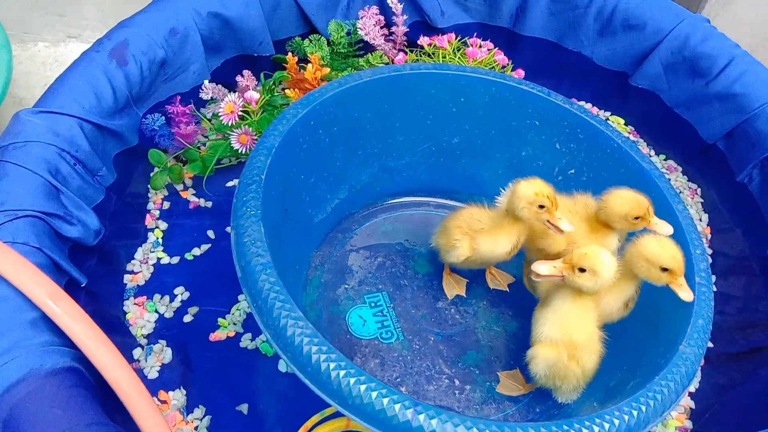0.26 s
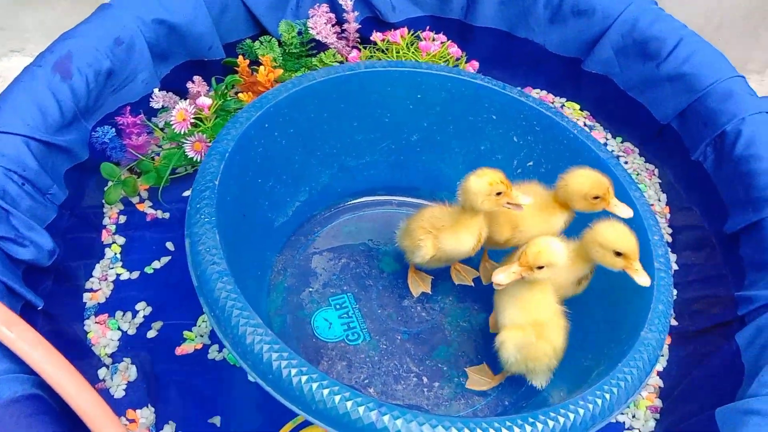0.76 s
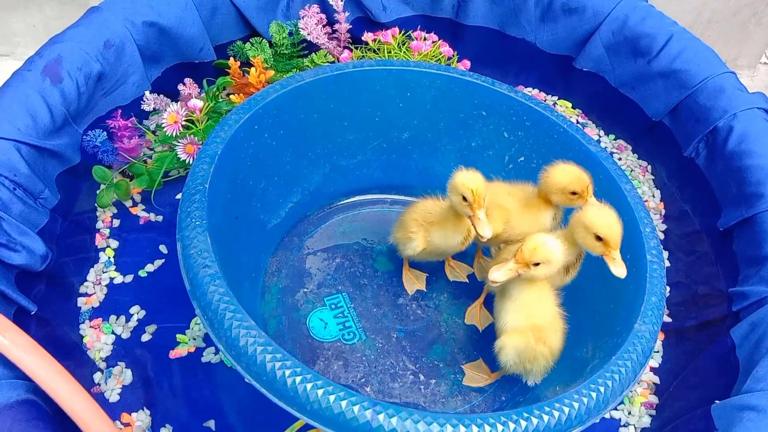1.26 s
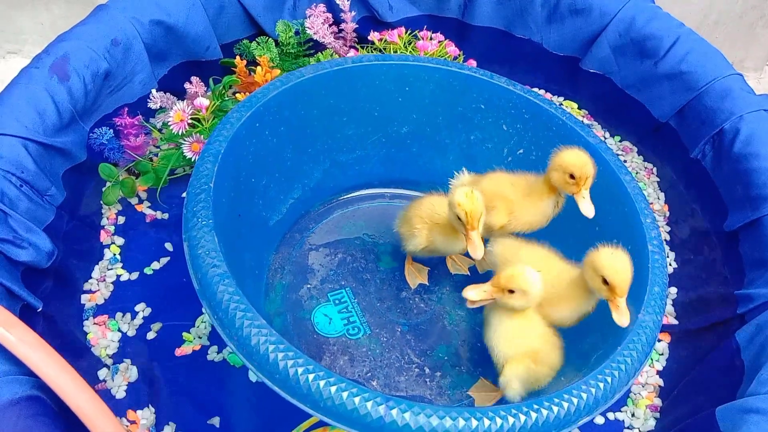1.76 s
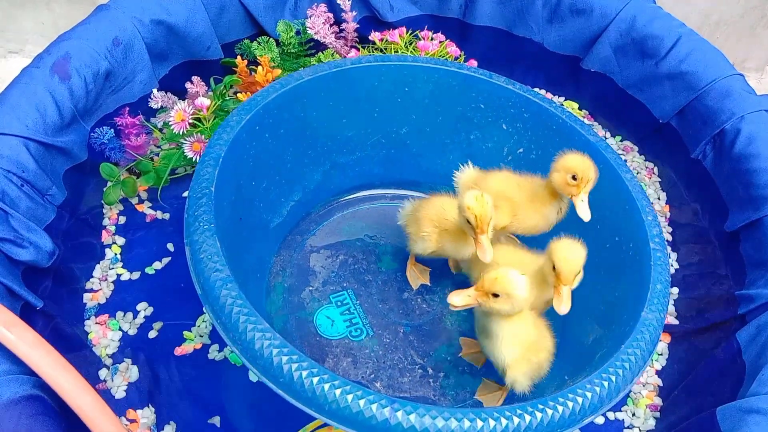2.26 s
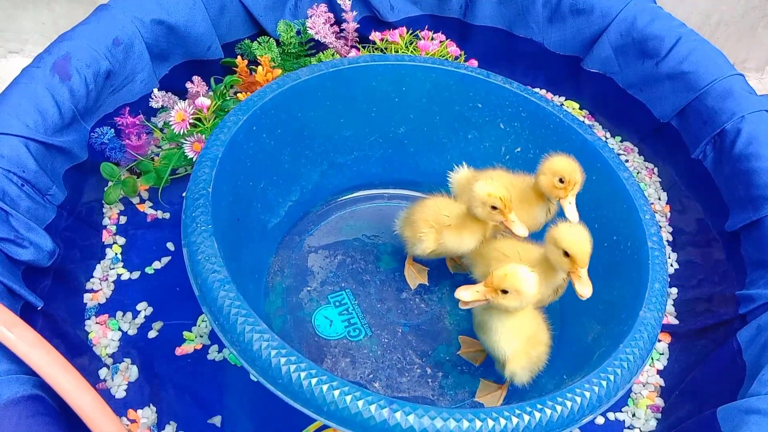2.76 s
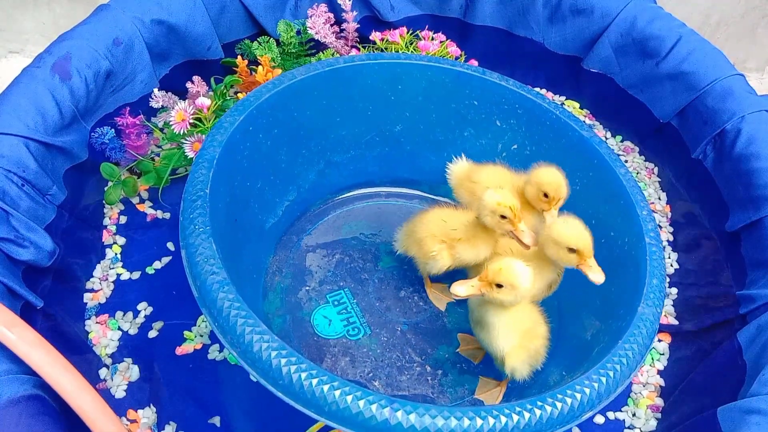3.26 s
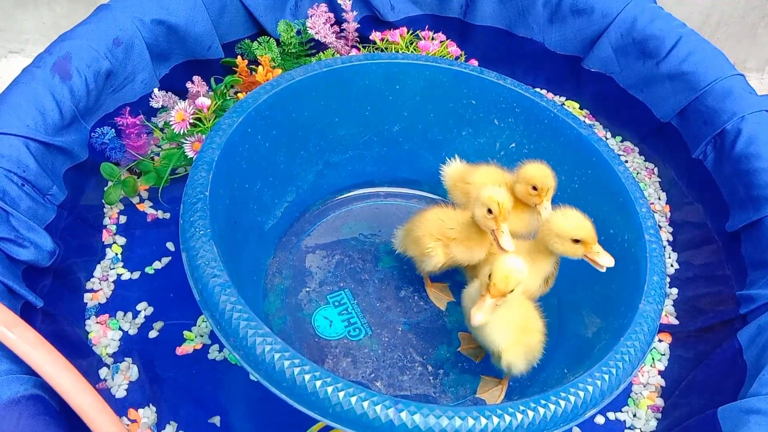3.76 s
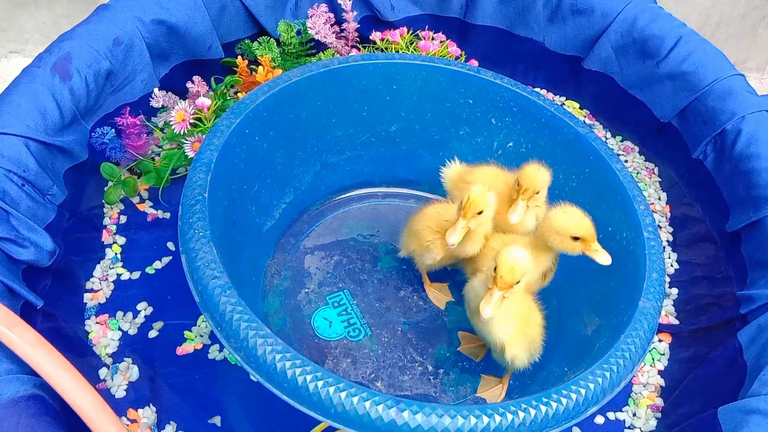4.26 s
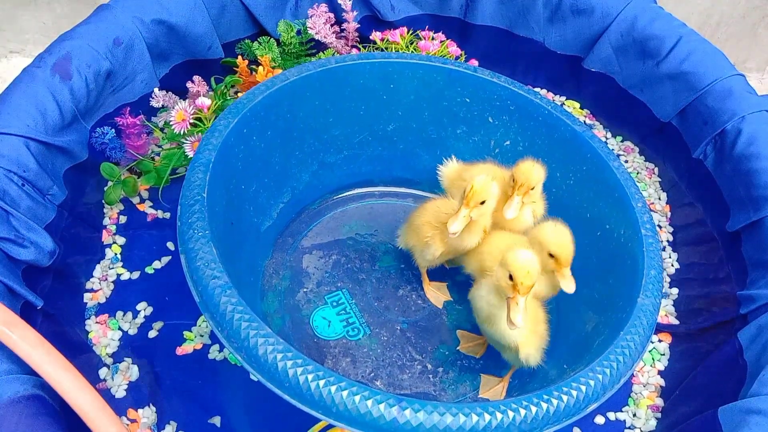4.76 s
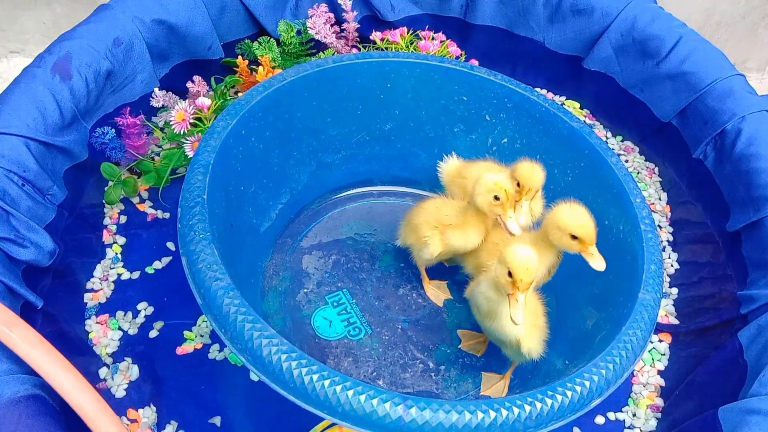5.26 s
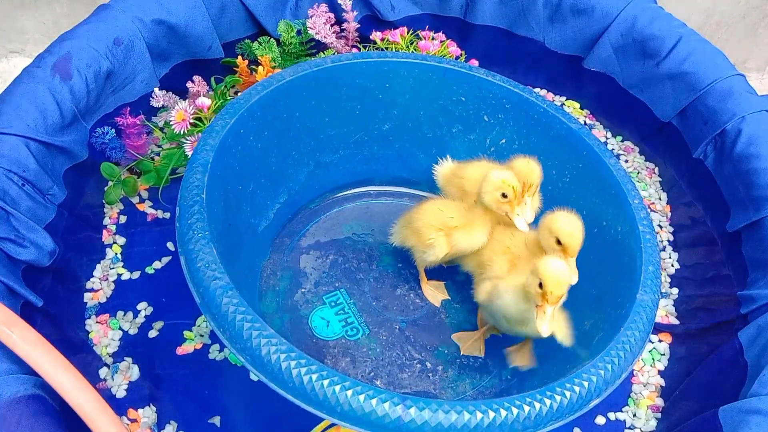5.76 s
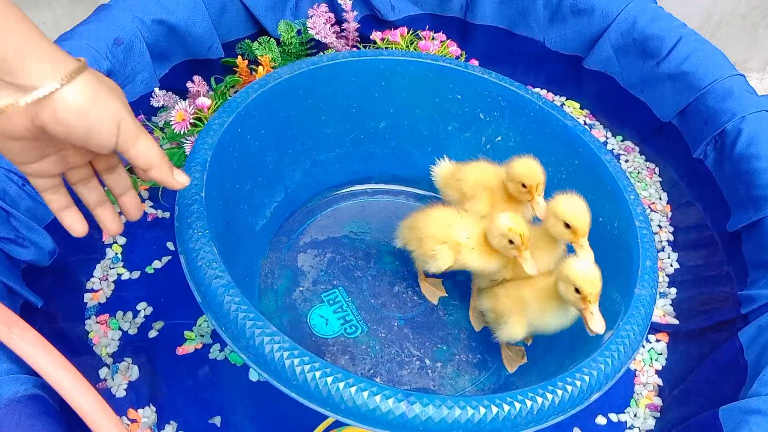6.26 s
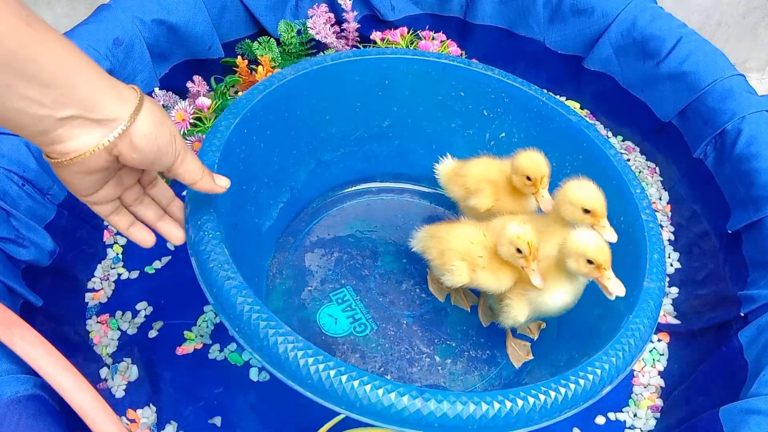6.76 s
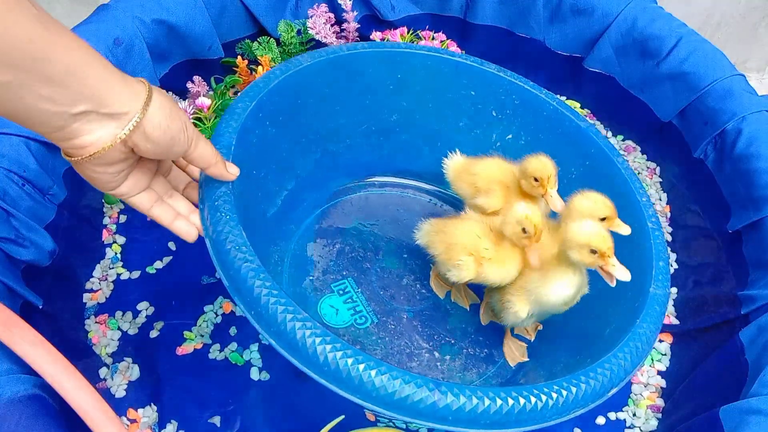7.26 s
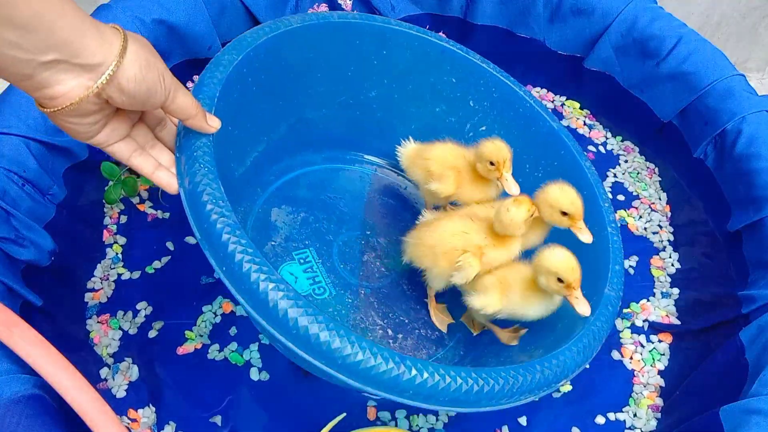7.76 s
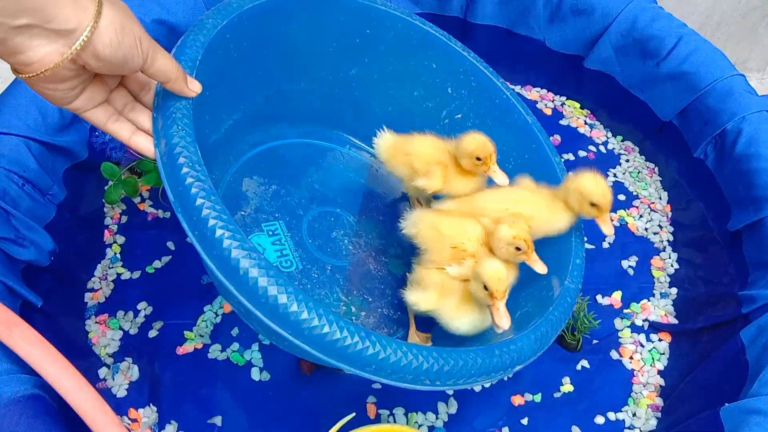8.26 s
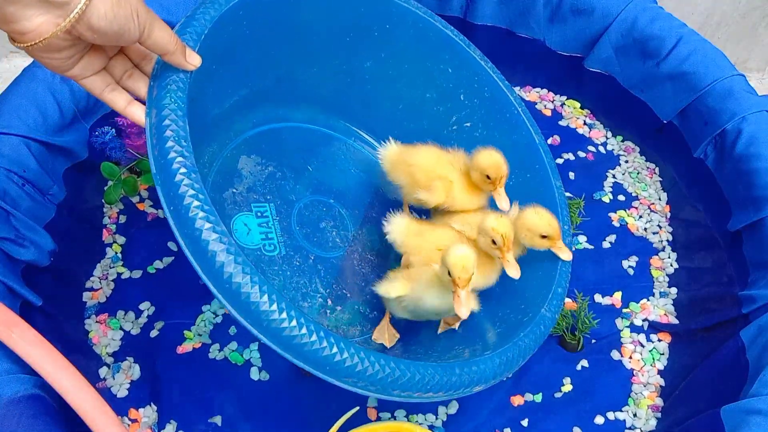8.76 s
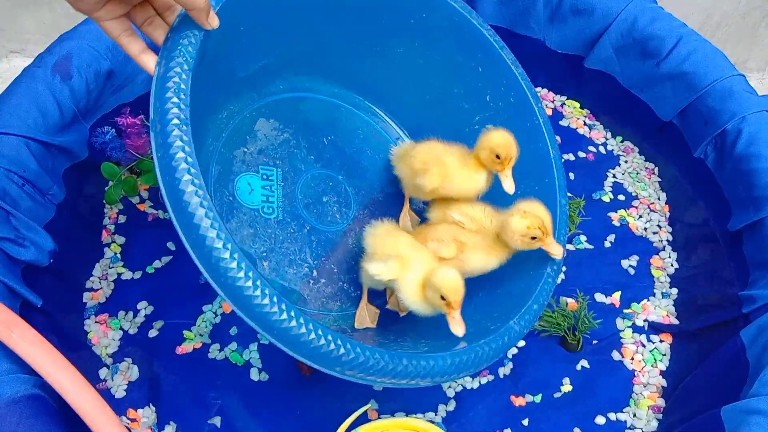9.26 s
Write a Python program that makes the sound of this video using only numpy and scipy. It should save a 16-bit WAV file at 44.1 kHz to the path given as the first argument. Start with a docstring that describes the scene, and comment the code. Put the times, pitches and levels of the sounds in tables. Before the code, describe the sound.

Ducklings peep shrilly over one another in a plastic tub, then call one at a time as their feet tap softly.

```python
"""Ducklings peep over one another in a plastic tub, close up, then call one at a time.
Each peep is a whistle with overtones that chirps in, glides and slides off; the tub and yard echo it.
Webbed feet tap and slip on the plastic, and the tub groans once as it is tipped. Behind them lie
far-off traffic, faint hiss and a late puff of breeze. A phone's suppressor ducks the quiet gaps."""
import sys
import numpy as np
from scipy import signal
from scipy.fft import rfft, irfft, next_fast_len
from scipy.io import wavfile
from scipy.ndimage import uniform_filter1d, map_coordinates

SR = 44100
rng = np.random.default_rng(int(sys.argv[2]) if len(sys.argv) > 2 else 0)


def master_out(mix):
    """Clip the mix to full scale and print it as 16-bit PCM to the path in sys.argv[1]."""
    frames = np.transpose(np.atleast_2d(mix))
    ceiling = np.clip(frames, -1, 1)
    pcm = np.round(ceiling * 32767).astype(np.int16)
    wavfile.write(sys.argv[1], SR, pcm)


N = 419391

# Resonances of the plastic tub: pitch_hz, level_db, t60_s
TUB_MODES = [(450, -7, .025), (610, -3, .02), (790, 0, .025), (1130, 0, .025), (1240, -1, .025),
             (1420, 0, .03), (1650, -2, .02), (2000, -7, .018), (2600, -10, .015)]


def ducklings():
    """The brood: each peep carries a breathy rasp with narrow bands near 4.5 and 5.5 kHz."""
    # One row a peep: start_s, length_s, kind, start_hz, dip_hz, top_hz, end_hz, top_share (of the length),
    # level_db, swell_db, cancel_hz (pitch that the tub's echo cancels), rasp_db
    peeps = [(.01, 0.13, "lead", 3757, 3502, 3692, 3440, 0.8, -18, -1, 3493, -38),
             (0.134, .13, "answer", 3520, 3460, 3755, 3603, 0.5, -19.5, -4, 3950, -30),
             (0.353, .13, "lead", 3705, 3424, 3705, 3717, .8, -19, 2, 3433, -36),
             (0.452, .13, "answer", 3340, 3363, 3773, 3490, 0.5, -20, -2, 3950, -27),
             (.673, .13, "lead", 3782, 3484, 3660, 3563, 1, -21, 3, 3445, -34),
             (.713, 0.11, "thin", 3120, 2880, 2975, 2790, .75, -46.5, -0.5, 2840, -40),
             (0.773, 0.14, "answer", 3379, 3380, 3733, 3467, 0.5, -20, -3, 3950, -27),
             (1.007, .13, "lead", 3686, 3578, 3760, 3750, .85, -19.5, -1.5, 3900, -37.5),
             (1.037, .057, "thin", 3200, 2942, 2870, 2750, .6, -50, 0, 3290, -41.5),
             (1.094, .14, "answer", 3310, 3410, 3759, 3520, 0.5, -23, -4, 3906, -24),
             (1.284, 0.047, "answer", 3360, 3420, 3560, 3446, 0.9, -42.5, 2.5, 3800, -34),
             (1.34, 0.14, "lead", 3727, 3590, 3767, 3830, .75, -18.5, 0, 3870, -39.5),
             (1.417, .14, "answer", 3294, 3360, 3775, 3452, .62, -21.5, 1, 3950, -25.5),
             (1.671, 0.14, "lead", 3807, 3645, 3772, 3770, .75, -18, -3, 3920, -29),
             (1.752, .12, "answer", 3420, 3446, 3723, 3347, .6, -21.5, -3, 3660, -28.5),
             (2.0, 0.13, "lead", 3790, 3648, 3756, 3780, .78, -19, 2, 3840, -35.5),
             (2.073, .13, "answer", 3380, 3358, 3722, 3480, .55, -20.5, -5, 3767, -31),
             (2.296, 0.084, "low", 3100, 2404, 2550, 2450, 0.7, -46.5, 1, 2980, -31),
             (2.337, 0.14, "lead", 3747, 3598, 3757, 3680, .85, -19.5, -3.5, 3817, -36),
             (2.391, 0.12, "late", 3460, 3356, 3705, 3504, 0.5, -21.5, 0, 3950, -31),
             (2.57, 0.086, "low", 3220, 2904, 3022, 2930, .8, -34, 0.5, 2820, -27.5),
             (2.616, 0.038, "answer", 3510, 3680, 3890, 3840, 0.8, -35.5, -0.5, 4100, -30),
             (2.669, 0.13, "lead", 3740, 3590, 3747, 3650, 0.6, -18.5, -3, 3815, -32.5),
             (2.742, 0.12, "late", 3296, 3332, 3754, 3576, 0.5, -21.5, 5.5, 3663, -28),
             (2.843, 0.12, "low", 3280, 3025, 3210, 2932, 0.6, -32.5, 1.5, 3400, -29),
             (2.995, .13, "lead", 3682, 3725, 3843, 3710, 0.8, -21, 7, 3782, -28.5),
             (3.049, .13, "late", 3330, 3383, 3744, 3490, .7, -20.5, 3, 3674, -34.5),
             (3.121, 0.11, "low", 3380, 3100, 3320, 3114, 0.9, -29.5, 2.5, 3500, -23.5),
             (3.321, .13, "lead", 3770, 3603, 3815, 3800, .85, -21.5, 0.5, 3704, -29.5),
             (3.327, 0.065, "thin", 3270, 3105, 3118, 3170, .8, -34, 9.5, 3600, -36.5),
             (3.401, 0.11, "low", 3410, 3224, 3427, 3290, 0.9, -27, -1.5, 3600, -26),
             (3.44, .1, "answer", 3327, 3295, 3708, 3563, 0.5, -21, -3, 3960, -25.5),
             (3.651, .13, "lead", 3720, 3580, 3836, 3625, 0.9, -22.5, -3, 3670, -31.5),
             (3.686, .12, "low", 3360, 3063, 3355, 3403, .85, -26, 10.5, 3600, -32),
             (3.76, .12, "answer", 3314, 3310, 3731, 3450, .55, -20.5, -0.5, 3697, -24),
             (3.992, 0.098, "low", 3450, 3083, 3290, 3114, .72, -29, 1.5, 3500, -31),
             (4.013, .12, "lead", 3730, 3566, 3800, 3400, .7, -24, -2, 3830, -27.5),
             (4.1, .098, "answer", 3227, 3250, 3697, 3450, 0.4, -20, -2, 3670, -23),
             (4.339, .14, "lead", 3728, 3744, 3830, 3490, .72, -21.5, -4, 4000, -27.5),
             (4.401, 0.13, "late", 3200, 3334, 3734, 3464, .62, -25, 2, 3816, -20),
             (4.667, .13, "lead", 3677, 3778, 3865, 3644, 0.7, -19, -1, 3897, -30),
             (4.75, .11, "late", 3230, 3307, 3675, 3534, .75, -22.5, 8.5, 3622, -22),
             (4.989, .14, "lead", 3746, 3607, 3692, 3570, 0.9, -23, 2, 3900, -37),
             (5.118, 0.12, "late", 3220, 3100, 3607, 3568, 0.9, -27.5, 15, 3800, -17),
             (5.357, 0.13, "lead", 3710, 3500, 3766, 3617, .8, -22, 2, 3784, -32.5),
             (5.421, 0.059, "thin", 3210, 3060, 2830, 2500, 0.6, -49, 0, 3400, -17),
             (5.806, .12, "flick", 3070, 2904, 3395, 3510, .9, -35, 23.5, 3789, -11),
             (6.263, 0.089, "flick", 3192, 3077, 3510, 3470, 0.9, -36, 27.5, 3800, -12.5),
             (6.711, 0.098, "soft", 3090, 3185, 3483, 3532, 0.7, -28.5, 5, 3350, -15.5),
             (7.0, 0.12, "late", 3590, 3282, 3795, 3636, .82, -25.5, 7, 4000, -23),
             (7.292, .12, "solo", 3430, 3516, 3790, 3700, .82, -23.5, 4, 4040, -29.5),
             (7.597, .12, "solo", 3310, 3430, 3728, 3665, .7, -23, 3.5, 4000, -27),
             (7.937, .11, "solo", 3250, 3210, 3650, 3610, .8, -23.5, 4.5, 3900, -25.5),
             (8.225, .12, "solo", 3460, 3444, 3794, 3526, .68, -24, 4, 4000, -18.5),
             (8.851, 0.088, "glide", 2776, 2764, 3075, 3920, .3, -33, 29.5, 4200, -13),
             (9.385, .11, "glide", 2896, 2950, 3388, 3900, 0.3, -34, 17.5, 4200, -4)]
    # Colour of the breathy rasp: frequency_hz, relative_db
    breath_spectrum = [(2000, -60), (3600, -28), (4450, 0), (4950, -11), (5500, 0), (6200, -13), (7200, -8),
                       (8200, -32), (16000, -38)]
    # Colour of the burst as the voice breaks off: frequency_hz, relative_db
    burst_spectrum = [(1500, -25.5), (3000, -6), (5000, 6), (8000, -28.5), (15000, -17.5)]
    out, breath, burst = np.zeros(N), patchy(noise(breath_spectrum), depth_db=9), noise(burst_spectrum)
    for row in peeps:
        sound, lead_s = peep(row, breath, burst)
        add(out, row[0] - lead_s, sound)
    return out


def peep(row, breath, burst, chirp_s=.03, settle_s=0.007, slide_s=0.015):
    """One whistle: a hoarse rising chirp, a drop onto the note, a glide and a fast breaking slide."""
    # Character by kind of call: climb (1 prompt, 2 S-shaped), bend (1 straight, more is later),
    # attack_db, release_db (how far down it starts and ends), octave_db, chirp_db
    voices = {"lead": (1.5, 1.5, 5, 7.5, -16.5, -11), "answer": (1.15, 3, 12, 2, -12, -17.5),
              "late": (1.46, 2.5, 9.5, 1.5, -11.5, -22), "low": (1.5, 1.5, 2.5, 1.5, -8, -26),
              "solo": (1.2, 2, 9.5, 1.5, -10.5, -12.5), "soft": (2.3, 0.5, 13, 1, -2.5, -40),
              "flick": (2, 1, 20, 3.5, -4.5, -37), "glide": (1.1, 0.92, 9.5, 5, -9.5, -49),
              "thin": (2.5, 2.3, 5, 0.5, -24.5, -34.5)}
    # Where the pitch dips, by kind of call: dip_share (of the length)
    dips = {"lead": .3, "answer": .06, "late": .17, "low": .38, "thin": .45, "solo": .04, "soft": .04,
            "flick": .28, "glide": .03}
    # Closing slide, by kind of call: pitch_ratio
    slides = {"lead": .6, "answer": .54, "late": .56, "low": .7, "thin": .8, "solo": .54, "soft": .52,
              "flick": 1.24, "glide": 1.12}
    _, length_s, kind, *contour_hz, top_share, level_db, swell_db, cancel_hz, rasp_db = row
    climb, bend, attack_db, release_db, octave_db, chirp_db = voices[kind]
    t = np.arange(round((chirp_s + length_s + slide_s) * SR)) / SR - chirp_s
    progress = np.clip(t / length_s, 0, 1)
    before, after = np.clip(-t / chirp_s, 0, 1), np.clip((t - length_s) / slide_s, 0, 1)
    unsettled = np.sin(np.pi / 2 * np.clip(-t / settle_s, 0, 1)) ** 2  # 1 in the chirp, 0 on the note

    note_hz = melody(progress, *contour_hz, dips[kind], min(top_share, .95), climb, bend)
    overshoot = 0.27 * unsettled - 0.65 * before ** 1.5  # the chirp climbs past the note, then drops
    # The membrane flutters until it locks and as it lets go; strain makes the pitch waver.
    hoarse = .003 + .05 * unsettled + .12 * before + .055 * after
    waver = .002 * amp((rasp_db + 30) / 2) * wobble(110, len(t))
    pitch_hz = note_hz * (1 + overshoot) * slides[kind] ** after
    pitch_hz *= 1 + hoarse * wobble(900, len(t)) + waver

    held_db = effort(progress, level_db, swell_db, attack_db, release_db)
    fade_db = 30 if slides[kind] < 1 else 8  # a falling end dies, an upward flick keeps more push
    note_db = held_db - fade_db * after
    onset_db = max(held_db) + chirp_db - 25 * before
    envelope = amp(note_db + (onset_db - note_db) * unsettled) * (1 - after ** 4) * (1 - before ** 4)

    phase = 2 * np.pi * np.cumsum(pitch_hz) / SR + rng.uniform(0, 2 * np.pi)
    flicker_db = (1.1 + 7 * unsettled + 5 * after) * wobble(300, len(t))
    whistle = np.sin(phase) * amp(tub_colour(note_hz, cancel_hz) - 6 * unsettled + flicker_db)
    pressure = amp(-24 * unsettled - 14 * after)  # overtones need full pressure
    whistle += pressure * overtones(phase, pitch_hz, octave_db, rasp_db)

    stretch = rng.integers(N - len(t)) + np.arange(len(t))
    leak_db = rasp_db - 3 + 24 * (progress - .7) + 4 * wobble(60, len(t))
    leak = amp(leak_db) * (1 - unsettled) + amp(-3) * unsettled
    closing = amp(rasp_db + 3) * np.exp(-((t - length_s - .003) / .015) ** 2)
    return envelope * (np.sqrt(2) * whistle + leak * breath[stretch] + closing * burst[stretch]), chirp_s


def melody(progress, start_hz, dip_hz, top_hz, end_hz, dip_share, top_share, climb, bend):
    """Pitch through a peep: it settles into a dip, climbs to the top and bends away."""
    settle = np.clip(1 - progress / dip_share, 0, 1) ** 2
    rise = np.sin(np.pi / 2 * np.clip((progress - dip_share) / (top_share - dip_share), 0, 1)) ** climb
    away = np.clip((progress - top_share) / (1 - top_share), 0, 1) ** bend
    return dip_hz + (start_hz - dip_hz) * settle + (top_hz - dip_hz) * rise + (end_hz - top_hz) * away


def effort(progress, level_db, swell_db, attack_db, release_db, edge_share=0.23):
    """Level through a peep in dB: attack, a leaning hold, release."""
    attack = np.clip(1 - progress / edge_share, 0, 1)
    release = np.clip(1 - (1 - progress) / edge_share, 0, 1)
    return level_db + swell_db * (progress - .5) - attack_db * attack - release_db * release


def overtones(phase, pitch_hz, octave_db, rasp_db):
    """The shimmer above the whistle: a strained voice is brighter as well as raspier."""
    # Partials besides the octave: pitch_multiple, relative_db
    partials = [(1.5, -32.5), (3, -28), (4, -40)]
    size = len(phase)
    sound = amp(octave_db + 2.7 * wobble(90, size)) * np.sin(2 * phase + 1)
    strain_db = octave_db / 2 + 0.65 * (rasp_db + 26.0)
    for multiple, partial_db in partials:
        smear = .8 * wobble(400, size) * (multiple % 1 > 0)  # blurs the partial between harmonics
        gain = amp(partial_db + strain_db + 5.7 * wobble(44.1, size))
        sound += gain * np.sin(multiple * phase + smear) * (multiple * pitch_hz < SR / 2)
    return sound


def tub_colour(pitch_hz, cancel_hz, cancel_db=8, cancel_width_hz=55, ring_hz=3602, ring_width_hz=45):
    """Gain in dB on a gliding whistle: the tub's echo cancels one pitch and its air lifts another."""
    notch_db = cancel_db * np.exp(-((pitch_hz - cancel_hz) / cancel_width_hz) ** 2)
    lift_db = 2 * np.exp(-((pitch_hz - ring_hz) / ring_width_hz) ** 2)
    return lift_db - notch_db


def footsteps(scuff_t60_s=0.033, tick_t60_s=0.018):
    """Each step is a scuffed knock on thin plastic, ringing at slightly different pitches; claws tick."""
    # One row a step, levels relative: start_s, level_db, thud_db, tick_db
    steps = [(0.435, -39, -20.5, -31), (0.552, -38, -51, -15), (0.89, -42.5, -19, -2),
             (1.728, -43, -39, -16), (1.787, -45.5, -4, -13), (2.134, -37, -7, -26), (3.107, -50, -27, 4),
             (5.244, -52.5, -28.5, -5), (6.117, -54.5, -9.5, -6.5), (6.188, -44, -19, -48),
             (6.257, -56.5, -2, -29), (6.679, -53, -30.5, -21.5), (7.483, -60.5, -32, -10),
             (7.509, -48.5, -17, -16), (7.644, -56, -31, -25), (7.754, -51.5, -8, -17),
             (7.778, -46.5, -7, -26), (7.8, -47.5, -11, -10), (7.939, -44.5, -4.5, -11),
             (7.964, -56, 2, -13), (8.123, -48.5, -35, -42), (8.168, -52, -27, -19), (8.227, -52, -39, 2),
             (8.274, -37, -50, -15.5), (8.373, -31, -34.5, -14), (8.519, -50, -37, -15),
             (8.665, -51, -22, -10.5), (8.768, -51, -15.5, -17), (8.796, -50.5, -7.5, -34.5),
             (8.994, -32.5, -40, -26), (9.03, -50, -2.5, -43), (9.159, -47, -25.5, -17),
             (9.206, -40, -20.5, -45.5)]
    out, t = np.zeros(N), np.arange(SR // 8) / SR
    soft_foot = np.sin(np.pi / 2 * np.clip(t / .004, 0, 1)) ** 2
    for start_s, level_db, thud_db, tick_db in steps:
        detunes = 1 + 0.061 * rng.standard_normal(len(TUB_MODES))
        ring = np.zeros(len(t))
        for (hz, mode_db, t60_s), detune in zip(TUB_MODES, detunes):
            strike_db = mode_db + (thud_db + 10) * (hz < 900) + rng.normal(0, 3)
            ring += amp(strike_db - 60 * t / t60_s) * np.sin(2 * np.pi * hz * detune * t)
        scuff = rng.standard_normal(SR // 20) * amp(-60 * t[:SR // 20] / scuff_t60_s)
        body = signal.fftconvolve(ring * soft_foot, scuff / np.linalg.norm(scuff))[:len(t)]
        tick = amp(min(tick_db, 0) + 4 - 60 * t / tick_t60_s) * np.diff(rng.standard_normal(len(t) + 1))
        add(out, start_s, amp(level_db + 3.0) * (body + tick))
    return out


def slipping_feet():
    """Webbed feet drag over the floor and keep the tub's modes humming in uneven bursts."""
    # One fader curve for each spell of slipping: time_s, level_db
    slips = [
        [(5.85, -86), (6.206, -66), (6.35, -87.5)],
        [(7.6, -100.5), (8.376, -63), (8.566, -107.5), (9.168, -65), (9.4, -77.5)],
    ]

    def resonance(hz):
        return sum(amp(db) * 1j * hz * (2.2 / t60_s) / (mode_hz ** 2 - hz ** 2 + 1j * hz * 3.6 / t60_s)
                   for mode_hz, db, t60_s in TUB_MODES)

    drag = rng.standard_normal(N) * amp(4.3 * wobble(18, N))
    hum = unit(filtered(drag, lambda hz: resonance(hz) ** 2))
    return sum(fader(slip) for slip in slips) * hum


def tub_groan():
    """The tipped tub gives a short, low, sagging tone with its octave."""
    # Course of the groan: time_s, pitch_hz, level_db, octave_db
    course = [(7.73, 252, -89, -74), (7.776, 241, -60, -68), (7.92, 206, -77, -71)]
    time_s, pitch_hz, level_db, octave_db = np.transpose(course)
    t = np.arange(time_s[0], time_s[-1], 1 / SR)
    phase = 2 * np.pi * np.cumsum(np.interp(t, time_s, pitch_hz)) / SR
    tone = amp(np.interp(t, time_s, level_db)) * np.sin(phase)
    tone += amp(np.interp(t, time_s, octave_db)) * np.sin(2 * phase)
    out = np.zeros(N)
    add(out, time_s[0], np.sqrt(2) * tone * signal.windows.tukey(len(t), .25))
    return out


def echoes(x, tail_db, predelay_s=0.0037):
    """Slaps off the tub walls, then a yard tail that dies faster in the treble and keeps shifting."""
    # Reflections off the tub walls: delay_s, level_db
    walls = [(.0012, -32.5), (.0046, -14), (.011, -15.5), (.021, -18.5)]
    # Decay of the yard: frequency_hz, t60_s
    yard_decay = [(500, 0.75), (3500, 0.29), (7500, 0.21), (15000, 0.025)]
    out, step = x.copy(), SR // 4
    for delay_s, level_db in walls:
        add(out, delay_s, amp(level_db) * x)
    crossfade = signal.windows.hann(2 * step, sym=False)
    padded = np.pad(x, (step, 2 * step))
    for i in range(0, N + step, step):  # a fresh tail for each stretch
        hz, t, bands = signal.stft(rng.standard_normal(SR // 2), SR, nperseg=256)
        decay = amp(-60 * t / along(yard_decay, hz)[:, None])
        tail = signal.istft(bands * decay, SR, nperseg=256)[1]
        wet = signal.fftconvolve(padded[i:i + 2 * step] * crossfade, tail / np.linalg.norm(tail))
        add(out, (i - step) / SR + predelay_s, amp(tail_db) * wet)
    return out


def breeze():
    """Moving air rumbles on the microphone, with one puff near the end."""
    # Strength of the breeze: time_s, level_db
    strength = [(0.0, -94.5), (8.87, -94), (9.16, -72), (9.51, -88)]
    gusts = amp(3 * wobble(9.8, N))
    rumble = noise([(30, -33.0), (60, 5.5), (85, 0), (130, -3.5), (250, -44.5)])
    return fader(strength) * gusts * rumble


def ambience(yard_db=-80, hiss_db=-80):
    """A gently drifting bed of yard air and far-off traffic, with a steady hiss on top."""
    # Colour of the yard and traffic: frequency_hz, relative_db
    yard_spectrum = [(60, -37.5), (100, -13.5), (400, -10), (550, -12.5), (1000, -14), (1400, -7),
                     (1800, -15.5), (2400, -50.5)]
    # Colour of the hiss: frequency_hz, relative_db
    hiss_spectrum = [(2500, -14.5), (3500, -4.5), (8000, -1), (10500, 0.5), (13000, -23)]
    yard = amp(yard_db + 1.2 * wobble(3.0, N)) * noise(yard_spectrum)
    return yard + amp(hiss_db) * noise([(1200, -56.5)] + hiss_spectrum)


def amp(db):
    """Decibels as a gain."""
    return 10 ** (np.asarray(db) / 20)


def unit(x):
    """x scaled to rms 1."""
    return x / np.sqrt(np.mean(x ** 2) + 1e-20)


def along(points, hz):
    """Reads a curve of (frequency_hz, value) points on a log axis."""
    point_hz, values = np.transpose(points)
    return np.interp(np.log(hz + 1), np.log(point_hz + 1), values)


def filtered(x, response):
    """x through an equaliser whose gain is response(hz)."""
    size = next_fast_len(len(x) + 8192)
    return irfft(rfft(x, size) * response(np.fft.rfftfreq(size, 1 / SR)), size)[:len(x)]


def noise(spectrum):
    """Noise of rms 1, coloured by (frequency_hz, relative_db) points."""
    return unit(filtered(rng.standard_normal(N), lambda hz: amp(along(spectrum, hz))))


def patchy(x, depth_db):
    """x with random louder and weaker patches in time and frequency."""
    bands = signal.stft(x, nperseg=256)[2]
    patches = uniform_filter1d(rng.standard_normal(bands.shape), size=3, axis=0)
    patches = uniform_filter1d(patches, size=8, axis=1)
    return unit(signal.istft(bands * amp(depth_db * unit(patches)), nperseg=256)[1][:N])


def wobble(rate_hz, size):
    """A smooth random curve with rate_hz knots a second."""
    knots = rng.standard_normal(int(size * rate_hz / SR) + 4)
    return map_coordinates(knots, [np.arange(size) * rate_hz / SR])


def fader(points):
    """A gain curve through (time_s, level_db) points, silent outside them."""
    time_s, level_db = np.transpose(points)
    return amp(np.interp(np.arange(N) / SR, time_s, level_db, left=-120, right=-120))


def add(track, start_s, sound):
    """Mixes a sound into the track; what falls outside is lost."""
    i = round(start_s * SR) + np.arange(len(sound))
    inside = (i >= 0) & (i < len(track))
    track[i[inside]] += sound[inside]


def scene():
    """Mono mix: echoing peeps in front, drier feet and the groan behind, over the outdoor bed."""
    bed = ambience() + breeze()
    peeps = echoes(ducklings(), tail_db=-13.0)
    feet = echoes(footsteps() + slipping_feet(), tail_db=-20.5)
    return (peeps + feet + tub_groan() + bed)[None]


def record(dry, open_db=-58, deepest_db=-12, band_open_db=-96, band_deepest_db=-10, top_hz=15750):
    """The phone's suppressor ducks quiet moments, and weak bands further; the top treble is cut off."""
    x = dry[0]
    level_db = 10 * np.log10(np.abs(uniform_filter1d(x ** 2, size=2600)) + 1e-14)
    duck_db = uniform_filter1d(np.clip(level_db - open_db, deepest_db, 0), size=1800)
    bands = signal.stft(x, nperseg=512)[2]
    power = uniform_filter1d(uniform_filter1d(np.abs(bands) ** 2, size=5, axis=0), size=5, axis=1)
    band_db = 10 * np.log10(np.abs(power) + 1e-20)
    band_duck_db = np.clip(1.2 * (band_db - band_open_db), band_deepest_db, 0)
    suppressed = signal.istft(bands * amp(band_duck_db), nperseg=512)[1][:N] * amp(duck_db)
    return filtered(suppressed, lambda hz: hz < top_hz)[None]


dry = scene()
out = record(dry)
master_out(out)
```